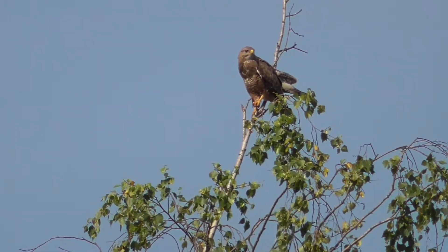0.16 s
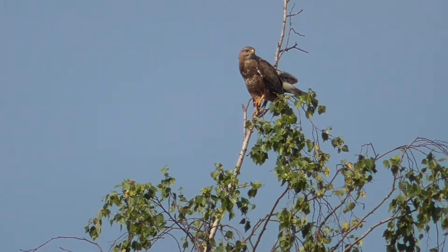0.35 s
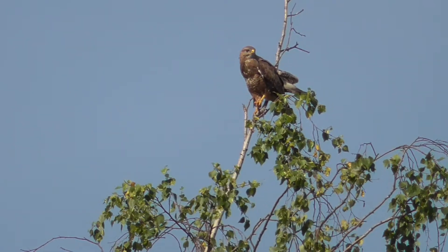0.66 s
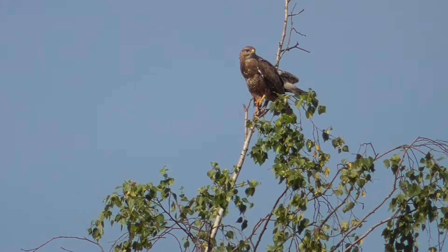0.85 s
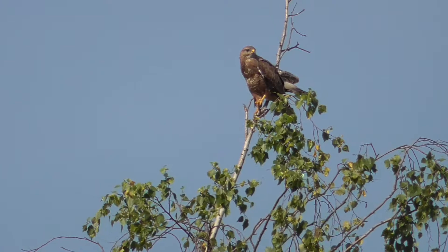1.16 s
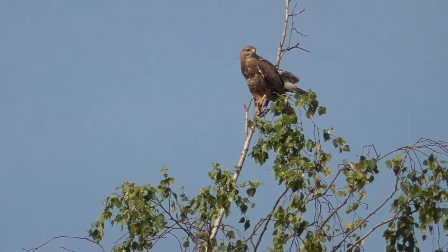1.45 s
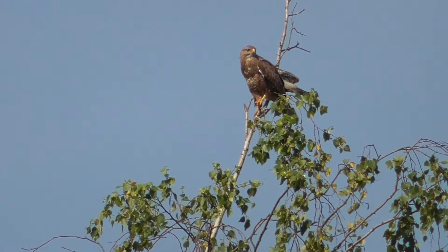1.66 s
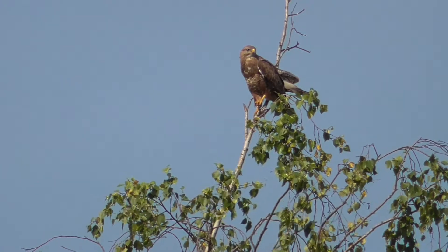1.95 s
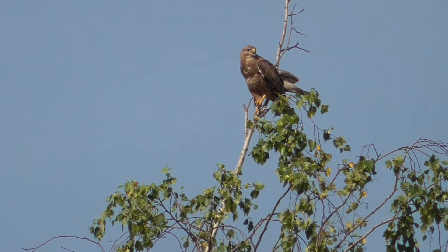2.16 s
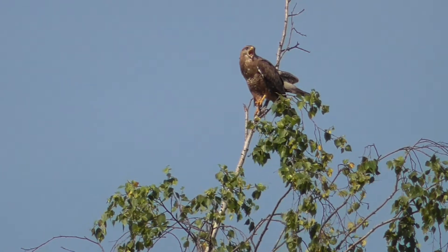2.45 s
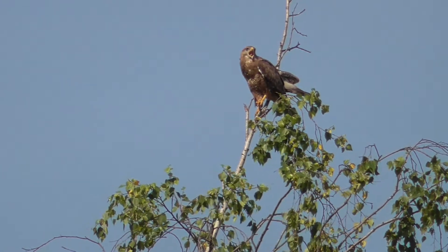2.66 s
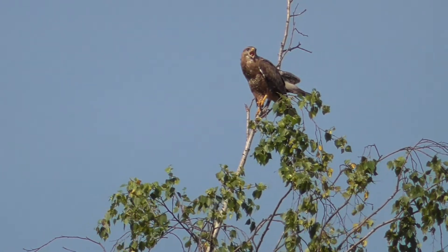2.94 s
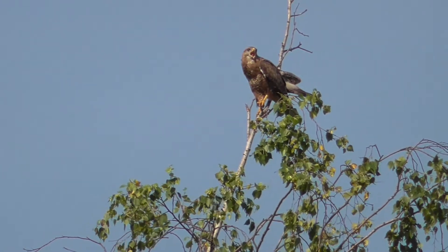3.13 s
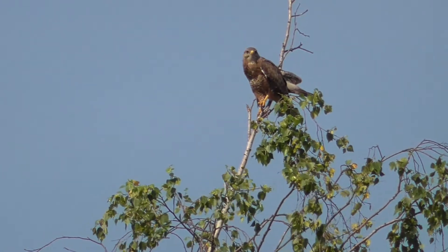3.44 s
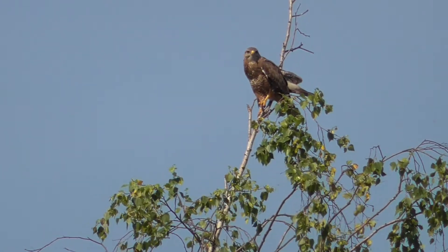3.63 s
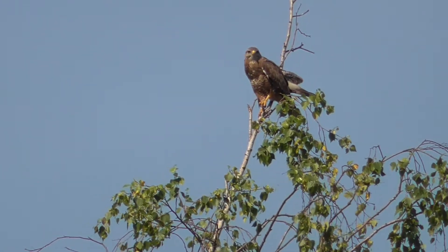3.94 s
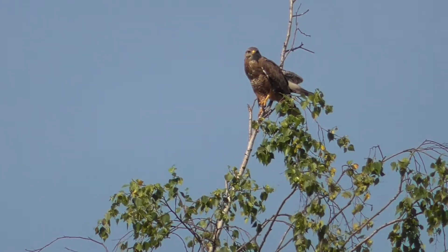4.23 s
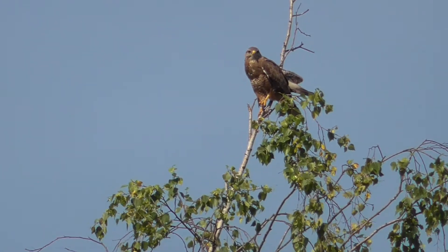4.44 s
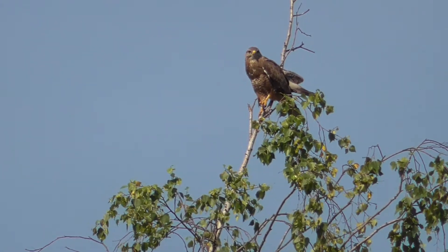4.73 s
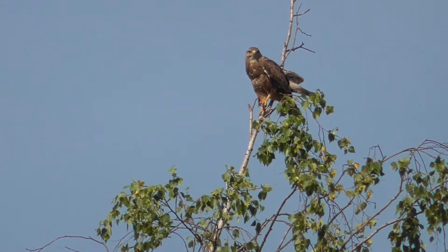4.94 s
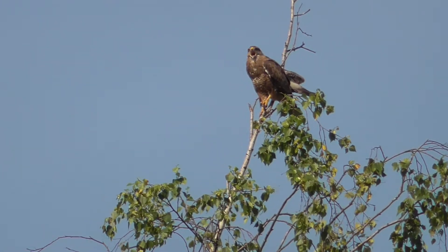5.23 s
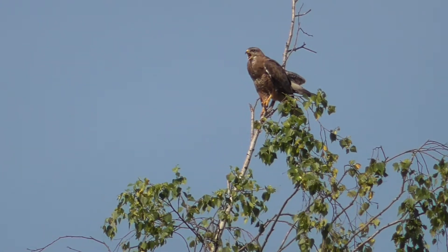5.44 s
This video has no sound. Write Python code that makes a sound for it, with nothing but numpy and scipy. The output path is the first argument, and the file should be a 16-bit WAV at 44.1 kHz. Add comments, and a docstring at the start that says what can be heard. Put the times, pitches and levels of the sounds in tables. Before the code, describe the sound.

A buzzard on a treetop calls once, about halfway through: a clear, falling mew in the centre, echoed softly by the trees. Before and after it come faint, high trills of small birds further off and tiny, regular ticks. A few soft, high rasps accompany and follow the call. Behind everything lie a far engine, swelling after the cry, the quiet rush of country wind and roads, and steady microphone hiss.

```python
"""A buzzard in open country

A buzzard on a treetop gives one long, whistling mew that leaps up and slides down; the trees echo it
faintly. Small birds trill thinly from further off, among faint, even ticks and a few soft, high rasps.
A distant engine drones and swells under the rush of far roads and wind, and the microphone hisses."""
import sys
import numpy as np
from scipy import signal
from scipy.fft import rfft, irfft
from scipy.io import wavfile
from scipy.ndimage import uniform_filter1d

SR = 44100
rng = np.random.default_rng(int(sys.argv[2]) if len(sys.argv) > 2 else 0)


def pcm_store(signal):
    """Save signal as 16-bit PCM."""
    levels = np.round(np.clip(np.atleast_2d(signal), -1, 1) * 32767)
    wavfile.write(sys.argv[1], SR, levels.astype(np.int16).T)


N = 246519
TIME = np.arange(N) / SR

# The tone of the far engine. Each row: frequency in Hz, relative level in dB.
ENGINE_SPECTRUM = [(30, -46), (50, -23), (70, -41), (95, -21), (115, -1.5), (145, 0), (194, 1),
                   (215, -11.5), (250, -21.5), (300, -16), (400, -29), (800, -60.5)]
# The engine's swells. Each row: time of the peak in seconds, boost in dB, rise and fall in seconds.
ENGINE_SWELLS = [(.38, 6, .5, 0.15), (3.95, 12.3, 1.1, 1.85), (4.9, 3, 0.069, 0.085)]
# The tone of far roads and wind. Each row: frequency in Hz, relative level in dB.
RUSH_SPECTRUM = [(20, -30), (35, -14), (50, -2.5), (100, 2.5), (300, 1.5), (420, -1), (620, 0), (800, -2),
                 (960, .5), (1250, -7.5), (1500, -9), (1750, -21), (2300, -20), (2800, -30), (7000, -54)]
# How alike left and right are in that rush. Each row: frequency in Hz, likeness from 0 to 1 (the same).
RUSH_LIKENESS = [(60, 1), (200, 0.04), (330, 0), (700, 0.18), (1200, 0.24), (3000, 0.08)]
# The small birds' calls. Each row: start in seconds, length in seconds, lowest pitch in Hz,
# height of the trill in Hz, trills per second, pitch wobble in Hz, level in dB.
BIRD_CHIRPS = [(1.141, .014, 7400, 60, 100, 15, -57), (1.174, .03, 7380, 100, 95, 22, -51.5),
               (1.196, 0.12, 7150, 390, 52, 30, -49.5), (1.301, 0.13, 7120, 580, 96, 51, -48.5),
               (2.207, 0.056, 4950, 950, 120, 310, -57), (3.503, 0.033, 5190, 892, 120, 280, -56.5),
               (4.09, .15, 6950, 280, 100, 55, -69), (4.989, 0.17, 7180, 400, 88, 86, -64),
               (4.994, .059, 5950, 300, 140, 60, -69)]
# The tune of the buzzard's mew. Each row: time in seconds, pitch in Hz.
MEW_TUNE = [(2.642, 883), (2.658, 1242), (2.674, 1491), (2.704, 1523), (2.724, 1519), (2.756, 1385),
            (2.804, 1244), (2.858, 1147), (2.9, 1133), (3.006, 945), (3.084, 919.5), (3.184, 801),
            (3.274, 734), (3.298, 695), (3.402, 591), (3.43, 531.0)]
# Pushes of effort in the mew. Each row: time in seconds, boost in dB, time to swell or fade in seconds.
MEW_PUSHES = [(2.709, 13, 0.043), (2.79, 3.5, 0.024), (3.09, 4, 0.028)]
# The strength of the mew's high overtones. Each row: time in seconds, boost in dB.
MEW_BRIGHTNESS = [(2.7, -3.5), (2.82, -1), (2.905, -9), (2.935, 10.5), (3.04, 7.5), (3.105, -2),
                  (3.15, 17.5), (3.27, 0), (3.4, 12)]
# How the throat and open beak shape the voice. Each row: frequency in Hz, gain in dB.
THROAT_GAIN = [(1300, -21.5), (1800, -22), (2050, -5.5), (2500, 1), (3050, -6.5), (3500, -16.5),
               (4200, -11.5), (5100, -15), (6200, -9.5), (7600, 1.5), (9200, 11), (10500, -38)]
# Runs of faint rasps. Each row: time of the first in seconds, number of rasps, spacing in seconds,
# level in dB, centre frequency in Hz.
HIGH_RASPS = [(2.862, 4, .068, -59.5, 12200), (4.532, 2, 0.13, -61, 9700), (4.785, 5, .039, -60, 11720)]
# The tone of the microphone's hiss. Each row: frequency in Hz, relative level in dB.
HISS_SPECTRUM = [(1000, 2.5), (2900, -5.5), (3600, -2.5), (5000, -4), (6200, -5), (7200, 0.5), (9500, 2.5),
                 (12000, 0.5), (12750, 0.5), (13000, 2.5), (13250, -0.5), (15500, -2.5)]


def amp(db):
    """Turns decibels into a number to multiply a sound by."""
    return 10 ** (np.asarray(db) / 20)


def unit(x):
    """Scales a signal to an average (rms) strength of 1."""
    return x / np.sqrt(np.mean(x ** 2) + 1e-20)


def at_hz(points, hz):
    """Reads between a table's rows on a logarithmic frequency scale."""
    f, value = np.transpose(points)
    return np.interp(np.log(hz + 1), np.log(f + 1), value)


def add(mix, s, sound):
    """Mixes a sound in, starting at s seconds."""
    part = mix[round(s * SR):][:len(sound)]
    part += sound[:len(part)]


def wander(size, rate_hz):
    """A smooth random wobble of strength about 1, no faster than about rate_hz."""
    hz = np.fft.rfftfreq(N, 1 / SR)
    return unit(irfft(rfft(rng.standard_normal(N)) / (1 + (hz / rate_hz) ** 4), N))[:size]


def band_noise(size, hz, width_hz):
    """Noise of strength about 1 in a band around hz."""
    turn = 2 * np.pi * hz * np.arange(size) / SR
    return wander(size, width_hz / 2) * np.cos(turn) + wander(size, width_hz / 2) * np.sin(turn)


def stereo_noise(spectrum, likeness):
    """Shaped noise; likeness, a number or a table, says how alike left and right are."""
    hz = np.fft.rfftfreq(N, 1 / SR)
    same = np.clip(at_hz(likeness, hz) if np.ndim(likeness) else likeness, 0, 1)
    mid, side = rfft(rng.standard_normal((2, N))) * amp(at_hz(spectrum, hz))
    mid, side = mid * np.sqrt(1 + same), side * np.sqrt(1 - same)
    return unit(irfft(np.array([mid + side, mid - side]), N))


def engine(drone_db=-49.5, hum_db=-57.5, hum_hz=81.85, waver_hz=3.27, throb=0.38):
    """Distance leaves only an engine's low, swelling drone and wavering hum, alike on both sides."""
    swell_db = sum(db * np.exp(-((TIME - s) / np.where(TIME < s, rise, fall)) ** 2)
                   for s, db, rise, fall in ENGINE_SWELLS)
    drone = amp(drone_db + swell_db) * stereo_noise(ENGINE_SPECTRUM, likeness=0.97)
    hum = np.sin(2 * np.pi * np.cumsum(hum_hz + waver_hz * wander(N, 6.5)) / SR)
    return drone + amp(hum_db) * unit(hum * (1 + throb * wander(N, 8.6)))


def country_rush(level_db=-49):
    """The soft, wide, steady rush of far roads and wind in the trees."""
    return amp(level_db) * stereo_noise(RUSH_SPECTRUM, RUSH_LIKENESS)


def small_birds(uneven=0.119, throb=0.33):
    """Each chirp is one high tone, trilled very fast in pitch and strength."""
    out = np.zeros(N)
    for s, length, low_hz, height_hz, rate, wobble_hz, db in BIRD_CHIRPS:
        size = int(length * SR)
        trill = 2 * np.pi * np.cumsum(rate * (1 + uneven * wander(size, 58))) / SR
        flick = np.sin(trill / 2) ** 2  # goes from 0 to 1 and back once per trill
        pitch = low_hz + height_hz * flick + wobble_hz * wander(size, 127)
        tone = np.sin(2 * np.pi * np.cumsum(pitch) / SR)
        add(out, s, amp(db) * unit(tone * (1 - throb * flick) * signal.windows.tukey(size, .3)))
    return out


def tree_echoes(sound, fade_s, build_s):
    """Trunks and leaves scatter random echoes, different on each side, that fall 60 dB in fade_s."""
    t = np.arange(SR) / SR
    echoes = rng.standard_normal((2, SR)) * (rng.random((2, SR)) < 3000 / SR)  # about 3000 a second
    echoes *= amp(-60 * t / fade_s) * (1 - np.exp(-(t / build_s) ** 2))
    echoes /= np.linalg.norm(echoes, axis=1, keepdims=True)
    return signal.fftconvolve(sound[None], echoes, axes=1)[:, :N]


def ticks(first_s=1.198, every_s=.2328, level_db=-57, pitch_hz=6950, width_s=0.00146):
    """Tiny high ticks at an even beat, perhaps an insect; each is a quick downward slide."""
    out = np.zeros(N)
    t = np.arange(500) / SR
    from_middle = (t - t.mean()) / width_s
    shape = np.exp(-from_middle ** 2 / 2)
    times = np.arange(first_s, N / SR, every_s)
    for s, (softer_db, higher) in zip(times, rng.standard_normal((len(times), 2))):
        pitch = pitch_hz + 120 * higher - 300 * from_middle
        tone = np.sin(2 * np.pi * np.cumsum(pitch) / SR)
        add(out, s - t.mean(), amp(level_db - softer_db) * shape * tone)
    return out


def opening_squeak(start_s=2.638, squeak_s=.017, squeak_db=-48, scratch_s=0.064, scratch_db=-56):
    """The buzzard's voice makes a false start: a scratchy upward flick, higher than the mew."""
    size, scratch_size = int(squeak_s * SR), int(scratch_s * SR)
    pitch = np.linspace(2050, 3600, size) * (1 + 0.048 * wander(size, 400))
    squeak = np.sqrt(2) * np.sin(2 * np.pi * np.cumsum(pitch) / SR) * np.hanning(size)
    scratch = band_noise(scratch_size, hz=3600, width_hz=3000) * np.hanning(scratch_size)
    out = np.zeros(N)
    add(out, start_s, amp(squeak_db) * squeak)
    add(out, start_s + squeak_s - scratch_s / 2, amp(scratch_db) * scratch)
    return out


def mew_effort_db(t, held_db=-42.6):
    """The buzzard holds a steady effort, with a hard push at the top note and lighter ones after."""
    return held_db + sum(db * np.exp(-((t - s) / width) ** 2) for s, db, width in MEW_PUSHES)


def narrow_dip_db(hz, centre_hz=2822, half_width_hz=24, depth_db=14):
    """Overtones briefly drop out as they slide through a narrow dip, as when an echo cancels them."""
    return -depth_db / (1 + ((hz - centre_hz) / half_width_hz) ** 2)


def buzzard_mew(catch_at_s=2.967, catch_s=.015, shimmer=0.17, attack_s=0.019, release_s=0.053):
    """A whistle with overtones; as it falls, the throat boosts 2, then 3, then 4 times its pitch."""
    times, tune_hz = np.transpose(MEW_TUNE)
    start, end = times[0], times[-1]
    t = np.arange(start, end, 1 / SR)
    pitch = uniform_filter1d(np.interp(t, times, tune_hz), size=480, mode="nearest")
    # the voice catches once on its way down: the pitch dips and flips back up
    catch = (t - catch_at_s) / catch_s
    pitch += 41.95 * catch * np.exp(-catch ** 2)
    # the bird's voice box is harsh for a moment before it locks onto its pitch
    jitter = 0.0031 + 0.075 * np.exp(-((t - start) / 0.016) ** 2)
    phase = 2 * np.pi * np.cumsum(pitch * (1 + jitter * wander(len(t), 350))) / SR
    effort_db = mew_effort_db(t)
    fade_db = effort_db - effort_db.max()
    hoarseness = 0.36 * (1 - amp(fade_db))  # clear at full effort, hoarse as it fades
    bright_db = np.interp(t, *np.transpose(MEW_BRIGHTNESS))
    # below 880 Hz, the lowest tone drops away by 51 dB per octave
    lowest_db = -11 - 51 * np.maximum(np.log2(880 / pitch), 0)
    voice = amp(lowest_db) * np.sin(phase)
    for k in range(2, 9):
        hz = k * pitch
        high = np.clip((hz - 2700) / 1000, 0, 1)
        waver = shimmer + hoarseness * high ** 3  # high overtones waver much more
        flutter = np.exp(waver * wander(len(t), 61) - waver ** 2)
        overtone = flutter * np.sin(k * phase + waver * wander(len(t), 100))
        # the very top overtones sound only at full effort
        top_db = 0.38 * fade_db * np.maximum((hz - 5800) / 1000, 0)
        overtone_db = 2 - 7.5 * (k - 2) + bright_db * high + top_db
        voice += amp(overtone_db + at_hz(THROAT_GAIN, hz) + narrow_dip_db(hz)) * overtone
    voice *= 1 + amp(-28) * wander(len(t), 600)  # swirling air adds faint noise around each tone
    fade_in_out = np.clip((t - start) / attack_s, 0, 1) * np.clip((end - t) / release_s, 0, 1)
    out = np.zeros(N)
    add(out, start, np.sqrt(2) * amp(effort_db) * voice * fade_in_out)
    return out


def rasps(length_s=.022, width_hz=3200):
    """Soft, very high puffs of noise in short, even runs."""
    out, size = np.zeros(N), int(length_s * SR)
    for first, count, spacing, db, hz in HIGH_RASPS:
        for s in first + spacing * np.arange(round(count)):
            add(out, s - length_s / 2, amp(db) * band_noise(size, hz, width_hz) * np.hanning(size))
    return out


def scene(echo_s=0.042, echo_db=-23):
    """The buzzard is central, the small birds half lost in the trees; engine and rush lean right."""
    mew, chirps = buzzard_mew() + opening_squeak(), small_birds()
    # the trees return mostly the mew's strongest band; leaves swallow the high overtones
    mew_band = signal.sosfilt(signal.butter(2, (1900, 5200), "bandpass", fs=SR, output="sos"), mew)
    near = mew + amp(-9.5) * tree_echoes(mew_band, fade_s=1.35, build_s=0.0055)
    # one early echo still holds the higher pitch and pulses against the falling call
    near += amp(echo_db) * np.interp(TIME - echo_s, TIME, mew)
    far = amp(-7.5) * chirps + tree_echoes(chirps, fade_s=0.57, build_s=0.002)
    lean_left, lean_right = amp([[.6], [-.6]]), amp([[-.8], [.8]])
    return near + far * lean_left + ticks() + rasps() + (engine() + country_rush()) * lean_right


def record(dry, hiss_db=-55.5, cutoff_hz=15620):
    """Each microphone adds its own hiss, a little more on the right; the highest treble is cut off."""
    hiss = amp(hiss_db) * stereo_noise(HISS_SPECTRUM, likeness=0.033) * amp([[-.35], [.35]])
    lowpass = signal.firwin(801, cutoff_hz, window=("kaiser", 9), fs=SR)
    return signal.oaconvolve(dry + hiss, lowpass[None], "same")


dry = scene()
out = record(dry)
pcm_store(out)
```